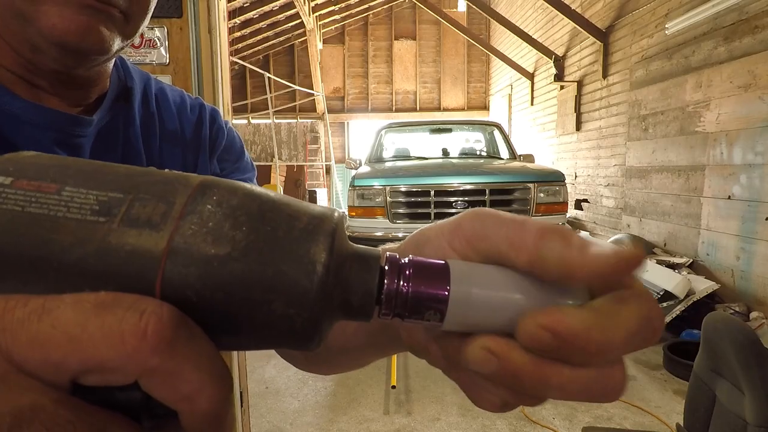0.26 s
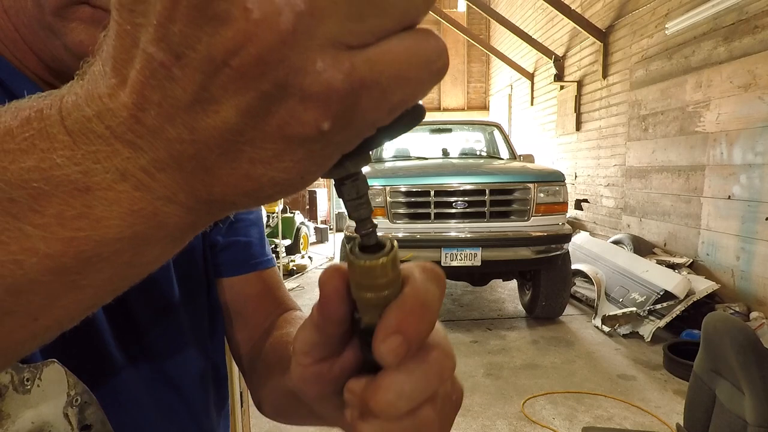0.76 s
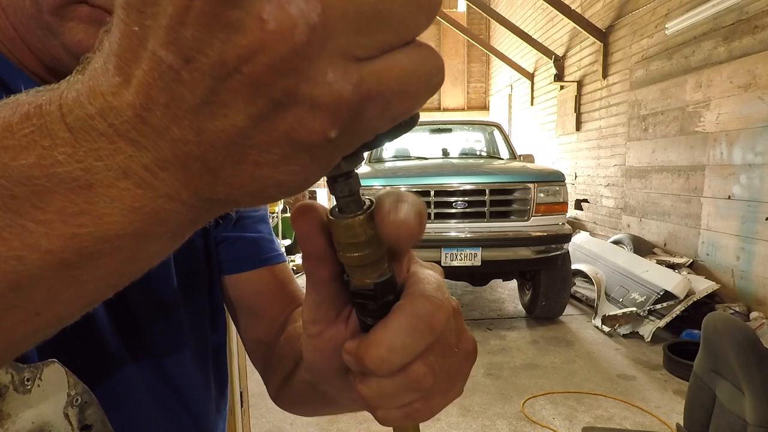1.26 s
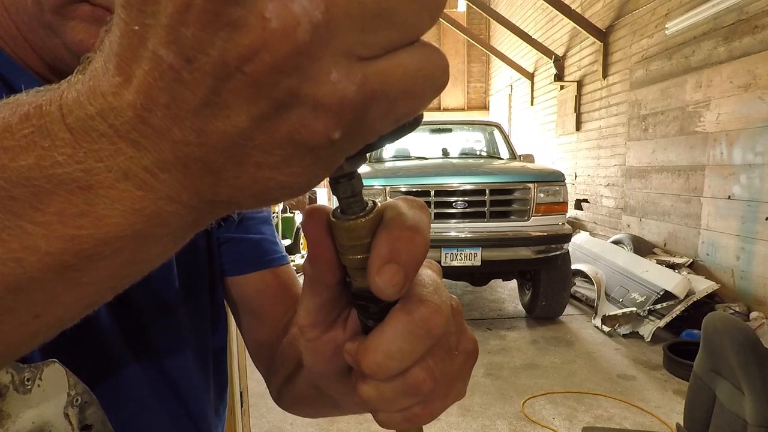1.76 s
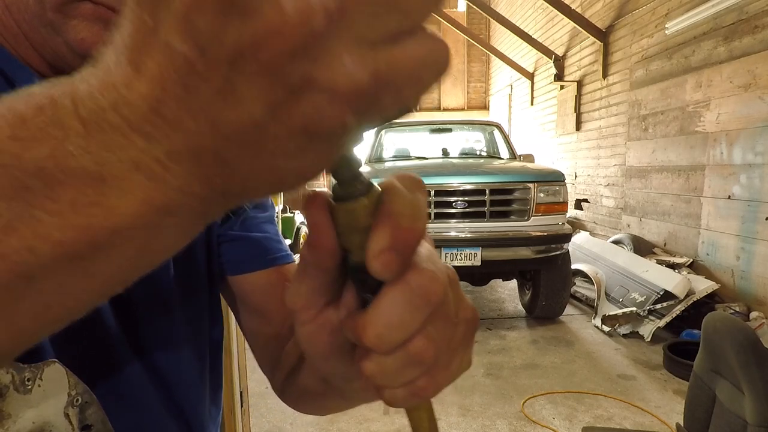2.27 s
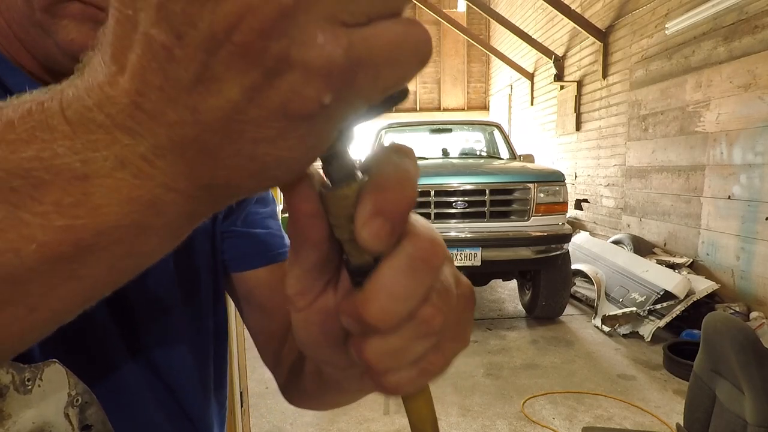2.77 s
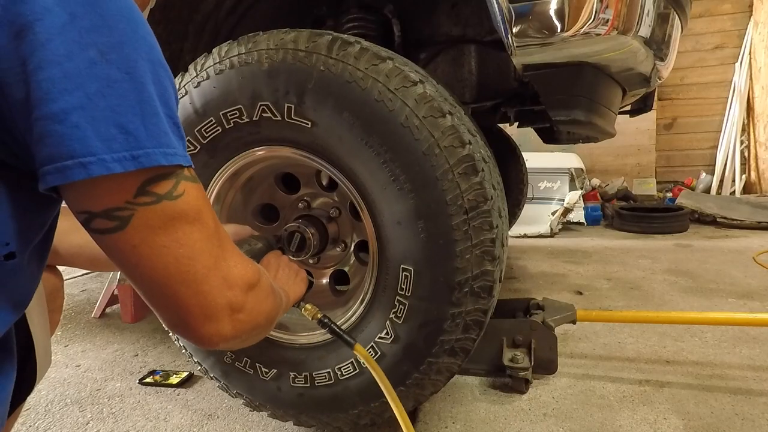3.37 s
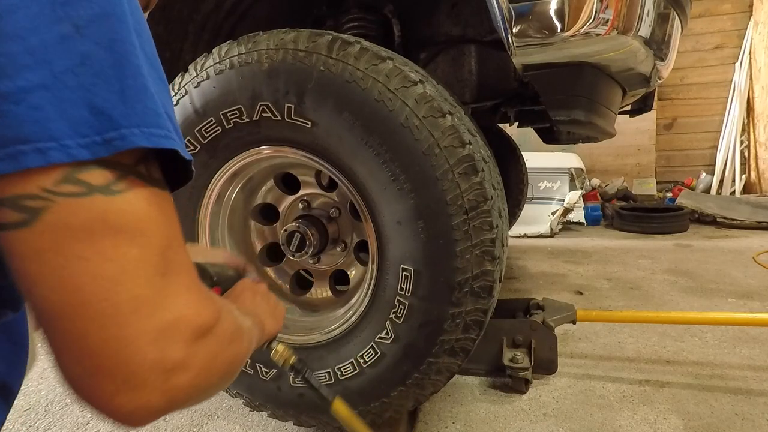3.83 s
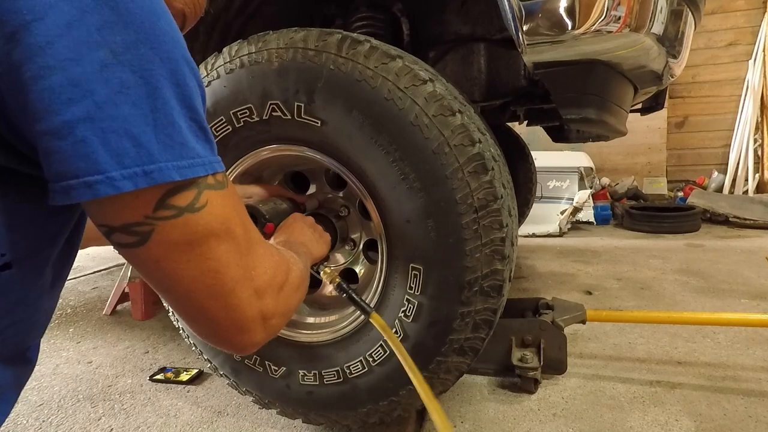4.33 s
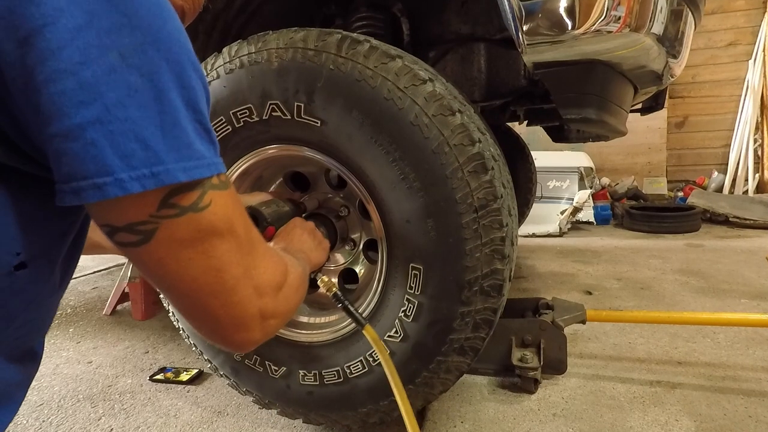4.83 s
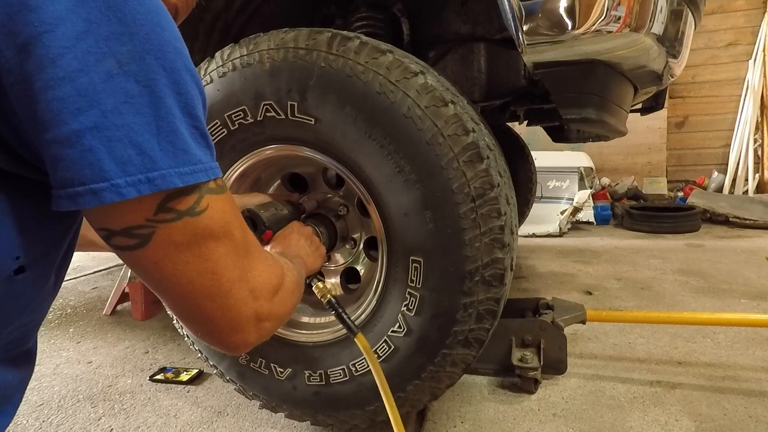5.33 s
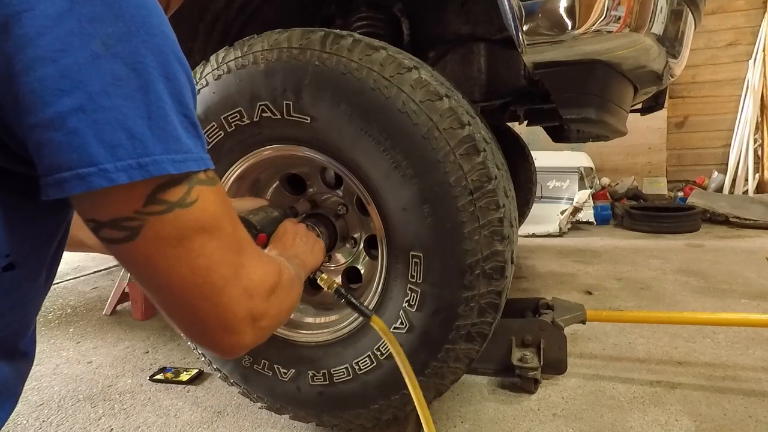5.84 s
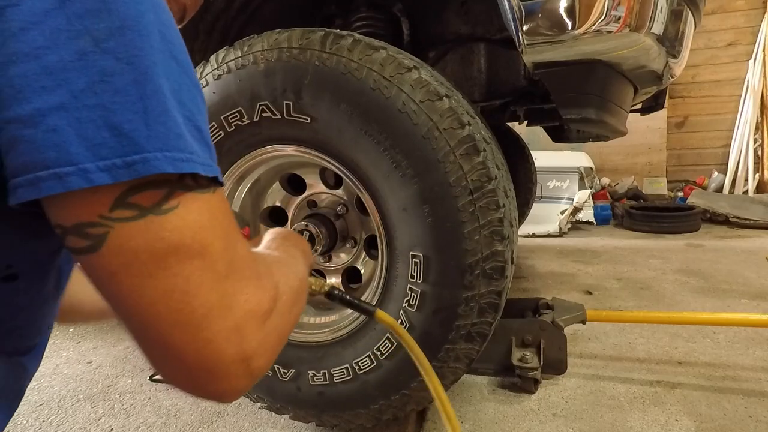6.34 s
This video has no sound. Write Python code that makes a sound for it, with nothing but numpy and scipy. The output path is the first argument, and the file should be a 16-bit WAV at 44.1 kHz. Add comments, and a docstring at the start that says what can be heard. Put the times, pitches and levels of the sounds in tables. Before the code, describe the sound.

Quiet garage air and a distant compressor thudding about ten times a second fill the first three seconds. Close to the microphone, small metal clicks come at 0.3 s, sharper coupler snaps around 1.0-1.2 s and 1.9 s, with faint high squeaks. A bright jet of air spits from 2.06 to 2.2 s, then light clicks at 2.4-2.5 s. At 3.0 s the compressor cuts out and an impact wrench bursts on: two cracks, a chopped exhaust roar and whine racing up, released at 3.26 s and coasting down until 4.15 s with faint ticks. Low puffs thump at 3.57 and, strongest, 4.13 s; a dry click at 4.39 s. At 4.73 s it clanks onto a nut and hammers about twenty blows a second, growing harsher, until 5.45 s, races briefly, and winds down from 5.6 s with knocks, a puff and a scrape near 6.4 s. Exhaust gusts rumble and flutter throughout the wrench work.

```python
"""A garage: with a compressor thudding far off, an air hose is snapped onto an impact wrench.
The coupler's damped rings click, metal squeaks, and a jet of filtered noise spits.
Then, at a truck wheel, the wrench runs twice: vane-chopped exhaust, rubbing and gliding harmonics race
and coast; noise cracks and socket rings pound a lug nut loose; rotor ticks, knocks and a scrape follow.
Gusts of exhaust air buffet the microphone as rumble, flutter and low puffs."""
import sys
import numpy as np
from scipy import signal
from scipy.fft import rfft, irfft, next_fast_len
from scipy.io import wavfile
from scipy.ndimage import uniform_filter1d

SR = 44100
rng = np.random.default_rng(int(sys.argv[2]) if len(sys.argv) > 2 else 0)


def log_audio(samples):
    """Write samples as a 16-bit WAV file to the path given in sys.argv[1]."""
    # one column per channel
    frames = np.atleast_2d(samples).T
    # limit to full scale, then quantise
    limited = np.clip(frames, -1, 1)
    pcm = np.round(limited * 32767).astype(np.int16)
    wavfile.write(sys.argv[1], SR, pcm)


N = 291060
TIME = np.arange(N) / SR
SIZE = next_fast_len(N + SR, True)
BINS = np.maximum(np.arange(SIZE // 2 + 1) * SR / SIZE, 1)
AT_WHEEL_S = 3.002
SIDES = np.array([[1], [-1]])  # left, right


def from_db(db):
    """Decibels to gain."""
    return 10 ** (np.asarray(db) / 20)


def rms_one(x):
    """Scale to an rms of one."""
    return x / np.sqrt(np.mean(x ** 2) + 1e-20)


def at_hz(points, hz):
    """Read a spectrum on a log-frequency axis."""
    points = np.array(points)
    return np.interp(np.log(hz), np.log(points[:, 0]), points[:, 1])


def between(start, end, fade):
    """Gate with sloping edges."""
    return np.clip(np.minimum(TIME - start, end - TIME) / fade, 0, 1)


def envelope(start, end, attack_s, release_s):
    """Straight attack, hold until the end, exponential release."""
    attack = np.clip((TIME - start) / attack_s, 0, 1)
    return attack * np.exp(-np.maximum(TIME - end, 0) / release_s)


def filtered(x, response):
    """Apply a frequency response."""
    return irfft(rfft(x, SIZE) * response, SIZE)[..., :N]


def coloured(x, spectrum):
    """Causal minimum-phase filter of the given spectrum; keeps the power of white noise."""
    gain = rms_one(from_db(at_hz(spectrum, BINS)))
    cepstrum = irfft(np.log(gain), SIZE)[:SIZE // 2]
    return filtered(x, np.exp(rfft(2 * cepstrum, SIZE) - cepstrum[0]))


def drift(rate_hz):
    """Slow random curve of rms one."""
    return rms_one(filtered(rng.standard_normal(SIZE), 1 / (1 + (BINS / rate_hz) ** 2)))


def resonance(hz, centre_hz, width_hz):
    """Response of one resonance, 1 at its top."""
    return 1 / (1 + 1j * (hz ** 2 - centre_hz ** 2) / (hz * width_hz))


def resonant_body(modes):
    """Summed response of the resonances (centre [Hz], width [Hz], level [dB])."""
    return sum(from_db(db) * resonance(BINS, hz, width_hz) for hz, width_hz, db in modes)


def add(out, s, sound):
    """Mix a short sound in at time s."""
    at = int(s * SR)
    out[at:at + len(sound)] += sound[:N - at]


def cracks(events, decay_s):
    """Each contact (time [s], level [dB]) is a noise burst that dies within milliseconds."""
    out, t = np.zeros(N), TIME[:SR // 20]
    for s, db in events:
        add(out, s, from_db(db) * rng.standard_normal(len(t)) * np.exp(-t / decay_s))
    return out


# garage noise: (frequency [Hz], relative level per Hz [dB])
AMBIENCE = [(15, -47.5), (25, -17), (60, -24), (100, -31), (141, -1.5), (185, -4), (256, -8.5), (394, -8),
            (887, -11.5), (988, -14), (3430, -27.5), (4610, -29), (5140, -29.5), (9070, -26.5),
            (14400, -42.5), (16000, -65)]
# left-right correlation of the garage noise: (frequency [Hz], correlation [-1 to 1])
AMBIENCE_LIKENESS = [(60, .85), (130, 0.39), (290, -0.0069), (640, -0.8), (1410, -0.59), (3100, -0.097),
                     (15000, -0.53)]
# low rumble, also in the gusts: (frequency [Hz], relative level per Hz [dB])
RUMBLE_COLOUR = [(20, -30.5), (31, -7), (42, 8), (52, -0.5), (64, -0.5), (80, -4.5), (100, -14.5),
                 (130, -26.5), (250, -46.5), (2000, -97)]


def background(air_db=-51, rumble_db=-60):
    """Partly correlated stereo room noise, with a faint rumble at first."""
    mid, side = coloured(rng.standard_normal((2, N)), AMBIENCE)
    alike = np.clip(at_hz(AMBIENCE_LIKENESS, BINS), -1, 1)
    air = filtered(mid, np.sqrt(1 + alike)) + filtered(side, np.sqrt(1 - alike)) * SIDES
    rumble = between(0, 0.56, 0.012) * coloured(rng.standard_normal(N), RUMBLE_COLOUR)
    return from_db(air_db) * air + from_db(rumble_db) * rumble


def compressor(stroke_hz=9.88, first_s=0.095, thud_db=-42.5, thud_hz=172, thud_s=0.0076,
               puff_db=-50.5, puff_s=0.0059, bass_db=1.0):
    """A far piston: damped sine thuds with noise puffs; the first strokes carry deep bass too."""
    starts = np.arange(first_s, AT_WHEEL_S, 1 / stroke_hz)
    thuds, t = np.zeros(N), TIME[:SR // 10]
    swell = t / thud_s * np.exp(1 - t / thud_s)
    for s in starts:
        level = from_db(thud_db + rng.normal(0, 0.7))
        hz = thud_hz * rng.normal(1, 0.048)
        add(thuds, s - .004, level * swell ** 2 * np.sin(2 * np.pi * hz * t))
    strokes = cracks([(s, puff_db) for s in starts], puff_s)
    puffs = coloured(strokes, [(90, -45.5), (130, -15.5), (200, 3.5), (260, -4), (420, -1.0),
                               (900, -29.0), (4000, -58)])
    bass = coloured(strokes, [(25, -6), (40, 2), (70, -6), (120, -6), (300, -22), (2000, -75)])
    no_bass = signal.butter(6, 135, "high", fs=SR, output="sos")
    return signal.sosfilt(no_bass, thuds + puffs) + from_db(bass_db) * between(0, 0.74, .02) * bass


# coupler clicks: (time [s], level [dB], ring [Hz], edge re level [dB])
COUPLER = [(0.323, -32, 6700, -12), (0.332, -28.5, 6800, -14), (0.372, -40.5, 6900, -20),
           (0.922, -41, 2900, -12), (0.966, -29.5, 3200, -14), (1.012, -30, 2900, -5),
           (1.022, -19.5, 3270, -7), (1.0509, -15.5, 2720, -13), (1.2039, -14, 2890, -12),
           (1.2051, -18, 1480, -17), (1.8821, -13.5, 2530, -11.5), (1.890, -29.5, 3530, 6.5),
           (1.8922, -12, 970, -14), (1.895, -21, 4300, 0), (2.428, -25.5, 3602, 0),
           (2.4791, -27.5, 3420, -2.5)]


def coupler(ring_db=3.0, ring_s=0.00046, edge_s=0.0024, edge_db=-4.0):
    """Brass parts knock inside a fist: a damped ring under a sharp noise edge."""
    out, t = np.zeros(N), TIME[:SR // 3]
    for s, db, hz, edge in COUPLER:
        add(out, s, from_db(db + ring_db) * np.sin(2 * np.pi * hz * t) * np.exp(-t / ring_s))
    edges = cracks([(s, db + edge + edge_db) for s, db, hz, edge in COUPLER], edge_s)
    out += coloured(edges, [(150, -5), (600, -6), (2400, 6.5), (3700, 8.0), (5800, -6.5),
                            (7400, 5.5), (8700, -10.5), (15000, -40.5)])
    # small parts radiate no bass
    return signal.sosfilt(signal.butter(4, 280, "high", fs=SR, output="sos"), out)


def rustle(level_db=-58.0):
    """The hand shifts softly on the hose: faded-in coloured noise."""
    noise = coloured(rng.standard_normal(N), [(100, -27.5), (400, 0.5), (1000, 4), (2000, -4),
                                              (4000, -26), (12000, -40)])
    return from_db(level_db) * between(0.52, 0.93, .15) * noise


# faint metal squeaks: (time [s], level [dB], pitch [Hz])
SLEEVE = [(0.85, -63, 4690), (1.205, -56, 4790), (1.628, -56, 4790), (2.73, -64, 4650), (4.347, -60, 4630)]


def squeaks(attack_s=0.015, hold_s=0.02, release_s=0.06, waver=0.007):
    """Thin sine tones of slightly wavering pitch that linger."""
    clock = np.cumsum(1 + waver * drift(40.9)) / SR
    out = np.zeros(N)
    for s, db, hz in SLEEVE:
        shape = envelope(s, s + hold_s, attack_s, release_s)
        out += from_db(db) * shape * np.sin(2 * np.pi * hz * clock)
    return out


# escaping jet: (frequency [Hz], relative level per Hz [dB])
SPIT_COLOUR = [(71, -64), (120, -39.5), (157, -7), (192, -22), (378, -23.5), (410, -17), (513, -28),
               (856, -18.5), (2340, -14.5), (6910, -1.5), (8660, -11), (9790, -14), (11300, -23),
               (14400, -14), (16000, -38.5)]


def spit(start_s=2.064, seal_s=2.1717, level_db=-15, attack_s=0.021, release_s=0.015):
    """Air escapes as a short jet of noise until the plug seals."""
    jet = from_db(level_db) * envelope(start_s, seal_s, attack_s, release_s)
    return jet * coloured(rng.standard_normal(N), SPIT_COLOUR)


HAMMERING_HZ, FREE_HZ, SPIN_UP_S = 268, 700, 0.113  # vane rate hammering, rate headed for when free
CRUISE_HZ = 500  # reference vane rate for levels


def vane_rate(free_s, release_s, top_hz, coast_s):
    """Vane rate: exponential rise once the nut is free, capped, exponential fall after release."""
    since_free = np.maximum(TIME - free_s, 0)
    racing = FREE_HZ - (FREE_HZ - HAMMERING_HZ) * np.exp(-since_free / SPIN_UP_S)
    return np.minimum(racing, top_hz) * np.exp(-np.maximum(TIME - release_s, 0) / coast_s)


# whine harmonics 1-3, before colour and speed: (level under power [dB], level coasting [dB])
WHINE_DB = [(-18.5, -20.5), (-31, -24), (-27, -27.5)]
# fixed resonances the whine glides through: (frequency [Hz], gain [dB])
WHINE_COLOUR = [(130, -13.5), (235, -8), (365, -9.5), (465, -24), (555, -14), (630, -13.5), (740, -12),
                (860, -2), (1080, -0.5), (1290, -8), (1560, 0.5), (1900, -15.5)]
MAIN_RESONANCE_HZ, MAIN_WIDTH_HZ = 1070, 440
VANES_OUT_HZ = (116, 204)  # silent, full: vanes drop away from the wall as the rotor slows


def whine(vane_hz, phase, powered, lift_db, waver_db=2.0, speed_power=1):
    """Each vane vents a puff: three harmonics glide through fixed resonances and fade at low speed."""
    tone = 0
    for k, (powered_db, coasting_db) in enumerate(WHINE_DB, 1):
        db = coasting_db + (powered_db - coasting_db) * powered + waver_db * drift(13)
        lift = lift_db * abs(resonance(k * vane_hz, MAIN_RESONANCE_HZ, MAIN_WIDTH_HZ)) ** 2
        tone = tone + from_db(db + at_hz(WHINE_COLOUR, k * vane_hz) + lift) * np.sin(k * phase)
    contact = np.interp(vane_hz, VANES_OUT_HZ, (0, 1))
    return np.sqrt(2) * (vane_hz / CRUISE_HZ) ** speed_power * contact * tone


# motor housing resonances: (centre [Hz], width [Hz], level [dB])
HOUSING = [(1060, 140, -2), (1580, 160, 0), (2600, 170, 4), (3100, 200, -8), (3650, 280, -3),
           (4200, 280, -1), (6400, 1400, -8)]


def whirr(vane_hz, phase, live, vanes=6, upper_db=9.5, uneven_db=-21, fall_db=21,
          flicker_db=3, flicker_s=.025):
    """Upper harmonics, plus weak rotor orders as vanes differ; they waver and flare in the housing."""
    # mode powers add
    housing = np.sqrt(sum(abs(from_db(db) * resonance(BINS, hz, width_hz)) ** 2
                          for hz, width_hz, db in HOUSING))
    t, hz, turn, tone = TIME[live], vane_hz[live], phase[live], 0
    knots = np.arange(t[0], t[-1], flicker_s)
    orders = np.arange(vanes, 16 * vanes) / vanes
    for k in np.setdiff1d(orders, [1, 2, 3]):  # the whine has these
        db = uneven_db if k % 1 else upper_db - fall_db * np.log10(k)
        waver = np.interp(t, knots, from_db(db + rng.normal(0, flicker_db, len(knots))))
        partial = np.sin(k * turn + rng.uniform(0, 2 * np.pi))
        tone = tone + waver * np.interp(k * hz, BINS, housing) * partial
    out = np.zeros(N)
    out[live] = np.sqrt(2) * tone
    return out


# exhaust hiss: (frequency [Hz], relative level per Hz [dB])
EXHAUST_COLOUR = [(180, -26), (300, 5), (462, -17), (546, -6.5), (667, -7), (1120, -13.5), (1320, -14),
                  (1580, -2), (2100, -9.5), (4090, -2.5), (4990, -10.5), (6520, 0), (8790, -16.5),
                  (14000, -23), (16000, -48)]


def exhaust(flow, phase, chop=0.78):
    """Air hiss chopped at the vane rate."""
    chopped = rng.standard_normal(N) * (1 + chop * np.sin(phase))
    return flow * coloured(chopped, EXHAUST_COLOUR)


# vanes and bearings rubbing: (frequency [Hz], relative level per Hz [dB])
RUB_COLOUR = [(350, -33.5), (600, -6.5), (717, -17), (1010, 5), (1350, -6), (1570, -5.5), (2270, -10.5),
              (2570, -9), (3340, -14), (3680, -7), (5120, -15.5), (6730, -6.5), (8740, -25.5),
              (13800, -32.5), (16000, -77)]


def rubbing(spin, phase, swell=0.29, level_db=-1.0):
    """Vanes and bearings rub: noise that swells once per turn of the six-vane rotor."""
    swelling = rng.standard_normal(N) * (1 + swell * np.sin(phase / 6))
    return from_db(level_db) * spin * coloured(swelling, RUB_COLOUR)


# wrench runs: (trigger pulled [s], nut free [s], trigger released [s], rotor sound ends [s],
# vane rate ceiling [Hz], coasting time constant [s], exhaust when hammering [dB],
# exhaust at ceiling rate [dB], opening burst [dB], rubbing before speed and trim [dB],
# lift at the whine's main resonance [dB])
RUNS = [(3.001, 3.04, 3.258, 4.16, 642, 0.445, -29, -20.5, -32, -28, 4.5),
        (4.728, 5.422, 5.604, 6.59, 561, 0.515, -29.5, -26, -22, -28.5, -4.0)]
VALVE_OPEN_S, VALVE_SHUT_S, BURST_RISE_S, BURST_FALL_S = 0.0035, 0.046, 0.024, 0.013


def motor(run, jitter=0.0022, rub_power=1.46, whirr_db=-1.5, engage_s=0.026, rub_build_s=0.32,
          stop_s=0.091, coast_in_s=0.012):
    """One run of the vane motor: exhaust, rubbing, whine and whirr all follow the vane rate."""
    (pull_s, free_s, release_s, rest_s, top_hz, coast_s,
     hammering_db, racing_db, burst_db, spin_db, lift_db) = run
    vane_hz = vane_rate(free_s, release_s, top_hz, coast_s) * (1 + jitter * drift(59))
    phase = 2 * np.pi * np.cumsum(vane_hz) / SR
    turning = np.clip(np.minimum((TIME - free_s) / engage_s, (rest_s - TIME) / stop_s), 0, 1)
    powered = envelope(pull_s, release_s, VALVE_OPEN_S, coast_in_s)
    flow = from_db(np.interp(vane_hz, (HAMMERING_HZ, top_hz), (hammering_db, racing_db)))
    flow *= envelope(pull_s, release_s, VALVE_OPEN_S, VALVE_SHUT_S)
    flow += from_db(burst_db) * envelope(pull_s, pull_s + BURST_RISE_S, BURST_RISE_S, BURST_FALL_S)
    spin = from_db(spin_db) * (vane_hz / CRUISE_HZ) ** rub_power
    spin *= np.clip((TIME - free_s) / rub_build_s, 0, 1)
    drive = from_db(whirr_db) * np.hypot(spin, flow / 3)
    rotor = rubbing(spin, phase) + whine(vane_hz, phase, powered, lift_db)
    rotor += drive * whirr(vane_hz, phase, turning > 0)
    return exhaust(flow, phase) + turning * rotor


def eddies(spectrum, apart, steady_s):
    """Turbulence of evened strength, mostly shared by both ports."""
    mid, side = coloured(rng.standard_normal((2, N)), spectrum)
    mid = mid / np.sqrt(uniform_filter1d(mid ** 2, int(steady_s * SR)) + 1e-6)
    return mid + apart * side * SIDES


# gusts on the microphone: (time [s], length [s], rumble level [dB], flutter level [dB])
GUSTS = [(2.978, 0.38, -28.5, -20.5), (3.543, 0.13, -23, -17.5), (3.665, 0.18, -20.5, -24.5),
         (4.125, 0.1, -20.5, -30), (4.265, 0.032, -21, -26.5), (4.353, 0.032, -25, -29.5),
         (4.739, 0.1, -48, -16.5), (4.856, 0.215, -48, -24.5), (5.079, 0.54, -25, -23),
         (5.633, 0.13, -26.5, -30.5), (6.326, 0.098, -24.5, -31.5)]
# flutter of air: (frequency [Hz], relative level per Hz [dB])
FLUTTER_COLOUR = [(70, -18.5), (120, -5), (190, 7), (240, -1.5), (320, -9.5), (420, -22.5), (700, -31.5),
                  (1500, -34.5), (5000, -87)]


def gusts(steady_rumble_db=-39, steady_flutter_db=-54, flutter_trim_db=-4.5,
          attack_s=0.012, release_s=0.026):
    """Exhaust air gusts, rumbling and fluttering, over a steady low rumble and faint flutter."""
    rumble, flutter = from_db(steady_rumble_db), from_db(steady_flutter_db)
    for s, length_s, low_db, high_db in GUSTS:
        shape = envelope(s, s + length_s, attack_s, release_s)
        rumble = np.hypot(rumble, from_db(low_db) * shape)
        flutter = np.hypot(flutter, from_db(high_db) * shape)
    wind = rumble * eddies(RUMBLE_COLOUR, apart=0.4, steady_s=0.085)
    wind += from_db(flutter_trim_db) * flutter * eddies(FLUTTER_COLOUR, apart=0.71, steady_s=0.052)
    return wind * between(AT_WHEEL_S, np.inf, 0.0053)


# sudden puffs: (time [s], level [dB], pitch [Hz], length [s], slap level [dB])
PUFFS = [(3.566, -16, 201.5, 0.087, -24), (4.134, -5.5, 220, 0.021, -11), (4.759, -16, 185, 0.016, -17),
         (6.341, -21, 203, 0.022, -36)]
# dull slap that starts a puff: (frequency [Hz], relative level per Hz [dB])
SLAP_COLOUR = [(100, -8), (330, 0), (440, -5), (600, -20), (1300, -28), (2000, -48), (5000, -60),
               (12000, -85)]


def buffeting(pan_db=1.6, slap_s=0.0096, swirl_db=-5.5, swirl_hz=44, swirl_s=0.058):
    """Air on the microphone: gusts, and low sine puffs that start with a slap and leave a swirl."""
    slaps = [(s, slap_db) for s, db, hz, length_s, slap_db in PUFFS]
    puffs = coloured(cracks(slaps, slap_s), SLAP_COLOUR)
    after = TIME[:SR // 2]
    swirl = np.exp(-after / swirl_s) * np.sin(2 * np.pi * swirl_hz * after)
    for s, db, hz, length_s, slap_db in PUFFS:
        t = TIME[:int(length_s * SR)]
        add(puffs, s, from_db(db) * signal.windows.tukey(len(t), .2) * np.sin(2 * np.pi * hz * t))
        add(puffs, s + length_s, from_db(db + swirl_db) * swirl)
    return (gusts() + puffs) * from_db(pan_db * SIDES)


# stray blows as the socket takes up or lets go of the nut:
# (time [s], level [dB], socket ring re level [dB])
STRAY_BLOWS = [(3.018, -6, -27.5), (3.0738, -5.5, -19.5), (4.743, -5.5, -17.5), (4.759, -4, -10),
               (4.77, -3, -12), (5.474, -6, -15)]


def blows(start_s=4.7895, period_s=0.0479, count=14, scatter_db=0.76):
    """Even blows that crack harder and ring less as the nut loosens, plus strays."""
    s = start_s + period_s * np.arange(count)
    db = np.linspace(-11.5, -4.5, count) + rng.normal(0, scatter_db, count)
    ring_db = np.linspace(4.5, -11, count)
    return list(zip(s, db, ring_db)) + list(STRAY_BLOWS)


# socket and nut modes: (frequency [Hz], level [dB], t60 [s])
SOCKET = [(2650, -11.5, 0.053), (3750, -14.5, 0.064), (4420, -13.5, 0.022), (4760, -11, 0.019),
          (5000, -5.5, 0.02), (5160, 2, 0.011), (5680, -3, 0.018), (5900, -7.5, 0.017),
          (6700, -11.5, 0.028)]
# crack of hammer on anvil: (frequency [Hz], relative level per Hz [dB])
BLOW_COLOUR = [(290, -36), (500, -9), (784, -11.5), (1510, -8), (2100, -7), (3540, -0.5), (4340, -5),
               (5880, -8.5), (7210, -6), (8830, -14.5), (14500, -30.5), (16000, -35)]


def hammer(crack_db=-6.0, crack_s=0.0034, ring_db=-1.5,
           rebound_db=-21.5, rebound_s=.029, rebound_decay_s=0.0076):
    """Every blow cracks and rings the socket; after each the hammer drags over its cam."""
    t, rings, strikes = TIME[:SR // 8], np.zeros(N), blows()
    hz, mode_db, t60_s = np.transpose(SOCKET)[:, :, None]
    decay = from_db(-60 * t / t60_s)
    for s, db, ring in strikes:
        strength = from_db(db + ring + ring_db + mode_db + rng.normal(0, 2.5, hz.shape))
        modes = np.sin(2 * np.pi * hz * t + rng.uniform(-1.7, 1.7, hz.shape))
        add(rings, s, np.sum(strength * decay * modes, axis=0))
    hits = cracks([(s, db + crack_db) for s, db, ring in strikes], crack_s)
    rebounds = [(s + rebound_s + rng.normal(0, 0.0045), rebound_db + rng.normal(0, 1.18))
                for s, db, ring in strikes]
    return rings + coloured(hits + cracks(rebounds, rebound_decay_s), BLOW_COLOUR)


# ticks of the slowing rotor, and knocks of the loose nut and socket: (time [s], level [dB])
TICKS_AND_KNOCKS = [(3.8072, -38), (3.8935, -37.5), (3.936, -35.5), (3.9764, -41), (4.0402, -35),
                    (4.1185, -40), (4.2078, -31.5), (5.6675, -17), (5.7488, -20), (6.1355, -25),
                    (6.2267, -37.5), (6.3934, -19), (6.543, -33)]
# ticks, knocks and scrape: (frequency [Hz], relative level per Hz [dB])
CONTACT_COLOUR = [(530, -23), (900, -1), (991, -25), (2190, -3.5), (3260, -8), (4360, -8.5), (6180, 3),
                  (7860, -7.5), (8660, -25), (12400, -16.5), (16000, -76)]


def ticks_and_knocks(level_db=-1.5, decay_s=0.004):
    """Ticks of the slowing rotor, and knocks of the loose nut and socket: coloured noise bursts."""
    contacts = cracks([(s, db + level_db) for s, db in TICKS_AND_KNOCKS], decay_s)
    return coloured(contacts, CONTACT_COLOUR)


# socket clank resonances: (centre [Hz], width [Hz], level [dB])
CLANK_MODES = [(1460, 120, -2), (4040, 130, 0)]
# one dry click: (time [s], level [dB])
CLICK = [(4.3862, -23.5)]


def dry_click(decay_s=0.00037):
    """One dry click: an uncoloured noise burst that dies in under a millisecond."""
    return cracks(CLICK, decay_s)


def clank(start_s=4.736, level_db=-19.5, attack_s=0.007, decay_s=0.025):
    """Rough contact rings the socket as it takes up the tight nut: noise through resonances."""
    shape = envelope(start_s, start_s + attack_s, attack_s, decay_s)
    ringing = filtered(rng.standard_normal(N), resonant_body(CLANK_MODES))
    return from_db(level_db) * shape * rms_one(ringing)


# scrape resonances: (centre [Hz], width [Hz], level [dB])
SCRAPE_MODES = [(4370, 200, 6), (4860, 640, 1), (6260, 460, -2.5), (7300, 540, -11), (11900, 535, -17)]


def scrape(start_s=6.392, end_s=6.515, level_db=-37.5, bite_db=-32.5, bite_s=0.003,
           fade_s=0.0089, grains_per_s=900):
    """The socket scrapes off the nut: dense random slips ring the steel, with a harder first bite."""
    slips = rng.standard_normal(N) * (rng.random(N) < grains_per_s / SR)
    pressure = from_db(level_db) * envelope(start_s, end_s, bite_s, fade_s)
    pressure += from_db(bite_db) * envelope(start_s, start_s, bite_s, fade_s)
    ringing = filtered(slips, resonant_body(SCRAPE_MODES))
    return pressure * rms_one(coloured(ringing, CONTACT_COLOUR))


# level between the microphone ports: (frequency [Hz], left re right [dB])
PORT_BALANCE = [(100, -1), (400, 10), (700, 7.5), (1290, -4.5), (2380, 5), (4400, -1.5), (6500, 7),
                (9000, -2), (15000, 0.5)]
# phase between the microphone ports: (frequency [Hz], left lead [rad])
PORT_PHASE = [(200, -0.9), (860, -1.7), (1640, -0.52), (1890, 1.33), (2500, -1.6), (3270, -0.18),
              (5080, 0.77), (6120, 0.9), (7320, 1.17), (8870, 3), (9650, 1.22), (12000, 1.5)]


def ports(x):
    """A near source reaches the two ports with a level and phase difference."""
    half = from_db(at_hz(PORT_BALANCE, BINS) / 2) * np.exp(.5j * at_hz(PORT_PHASE, BINS))
    return filtered(x, np.array([half, 1 / half]))


# early echoes off floor and truck: (left delay [s], right delay [s], level [dB])
ECHOES = [(0.0023, 0.0031, -20.5), (0.0058, 0.0047, -22)]


def echoes(x):
    """Floor and truck throw the sound back, with a different delay at each port."""
    out = np.zeros((2, N))
    for left_s, right_s, db in ECHOES:
        out += from_db(db) * np.array([np.interp(TIME - lag, TIME, x) for lag in (left_s, right_s)])
    return out


# garage reverberation: (frequency [Hz], t60 [s])
GARAGE_T60 = [(150, 0.18), (1000, 0.99), (4000, 0.55), (7000, 0.64), (14000, 0.54)]


def garage(x):
    """Diffuse reverberation: octave bands of noise, each dying at its own rate."""
    t, tail = TIME[:SR], 0
    for hz in 100 * 2 ** np.arange(8):
        edges_hz = [hz / np.sqrt(2), hz * np.sqrt(2)]
        band = signal.butter(2, edges_hz, "band", fs=SR, output="sos")
        noise = signal.sosfilt(band, rng.standard_normal((2, SR)))
        tail = tail + noise * from_db(-60 * t / at_hz(GARAGE_T60, hz))
    tail = tail * np.clip((t - .004) / 0.0027, 0, 1)
    return filtered(x, rfft(rms_one(tail) / np.sqrt(SR), SIZE))


def scene(hose_room_db=-17.0, wrench_room_db=-11.5, dip_db=-3.5):
    """Hose coupled close to the microphone, wrench farther off; room and hiss dip for a while."""
    hose = rustle() + coupler() + squeaks() + spit()
    wrench = sum(motor(run) for run in RUNS) + hammer()
    wrench += ticks_and_knocks() + dry_click() + clank() + scrape()
    room = garage(from_db(hose_room_db) * hose + from_db(wrench_room_db) * wrench)
    dip = from_db(dip_db * between(3.8, 4.39, 0.01))
    near = ports(hose + wrench) + echoes(wrench)
    return near + dip * (room + background()) + compressor() + buffeting()


def record(dry, ceiling=.86, cutoff_hz=15500):
    """The highest peaks are clipped and the top is cut."""
    low_pass = signal.ellip(10, .1, 80, cutoff_hz, fs=SR, output="sos")
    return signal.sosfilt(low_pass, np.clip(dry, -ceiling, ceiling))


dry = scene()
out = record(dry)
log_audio(out)
```